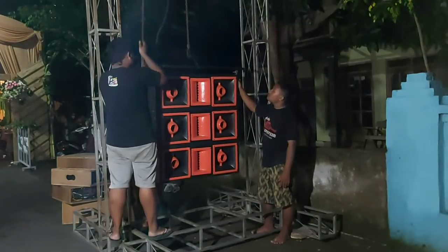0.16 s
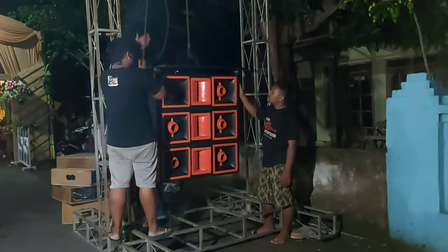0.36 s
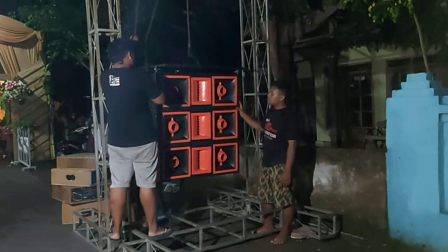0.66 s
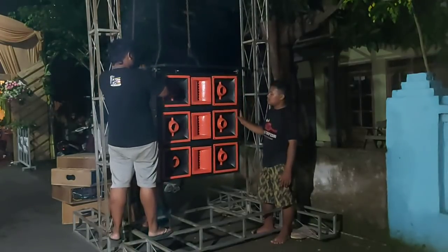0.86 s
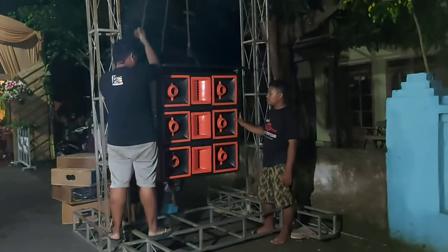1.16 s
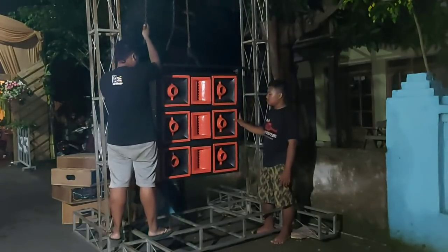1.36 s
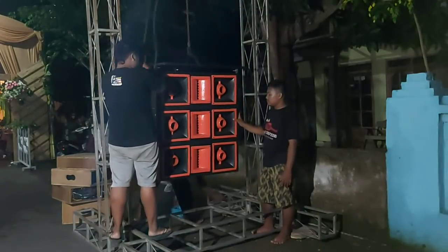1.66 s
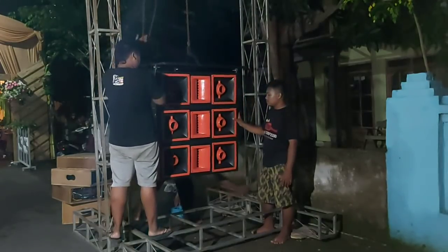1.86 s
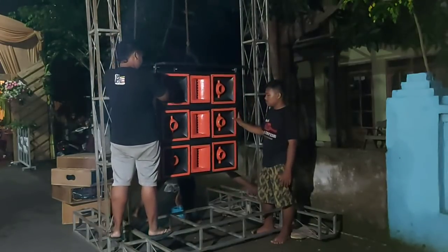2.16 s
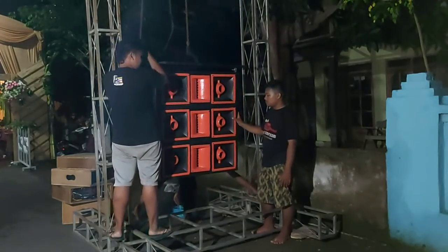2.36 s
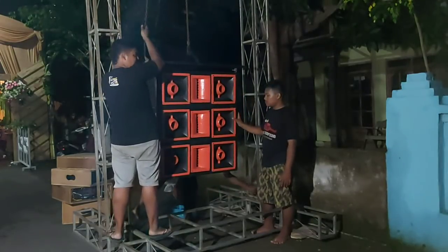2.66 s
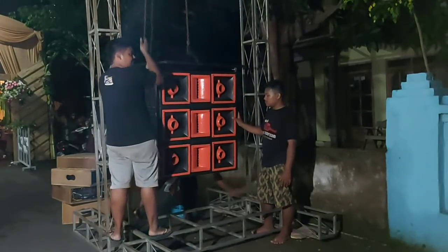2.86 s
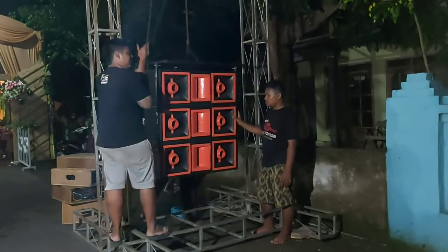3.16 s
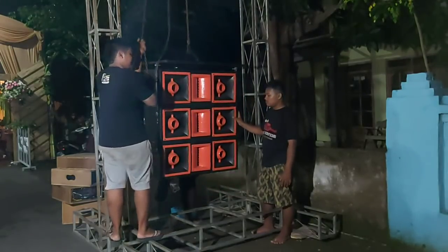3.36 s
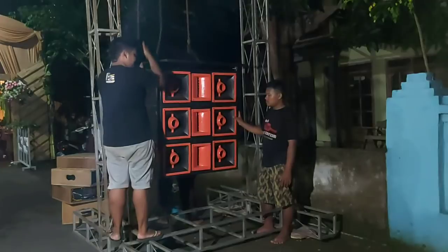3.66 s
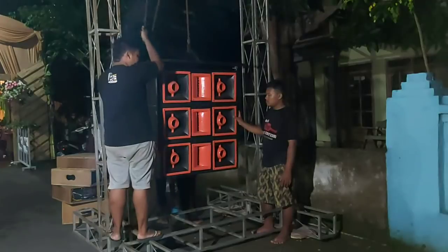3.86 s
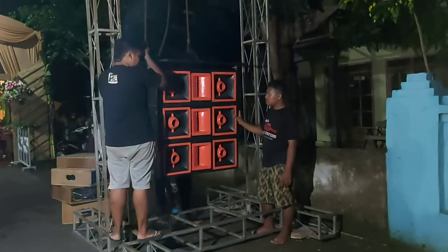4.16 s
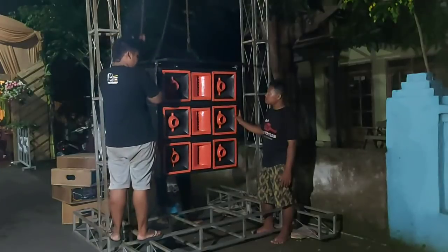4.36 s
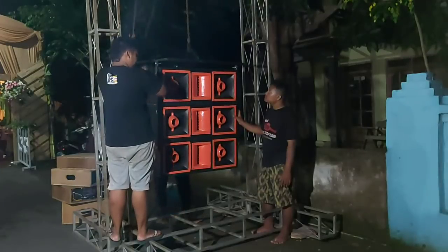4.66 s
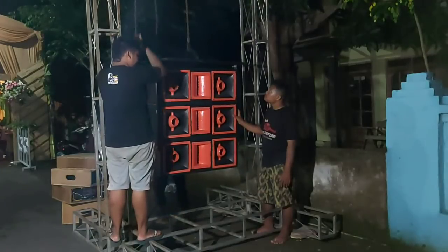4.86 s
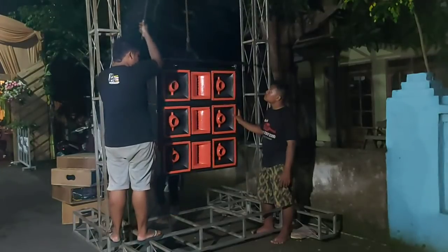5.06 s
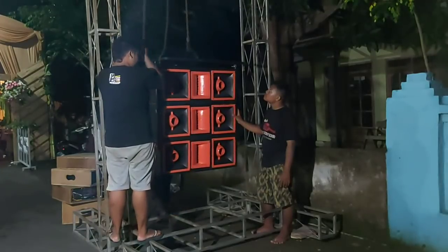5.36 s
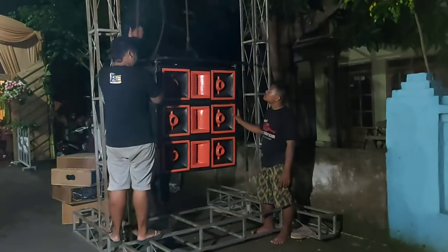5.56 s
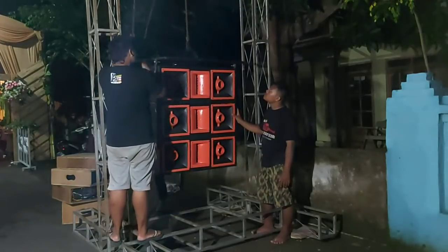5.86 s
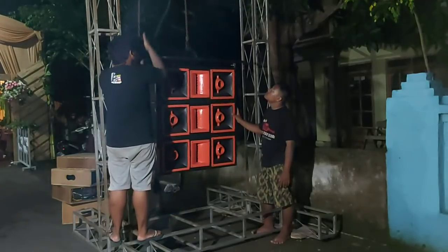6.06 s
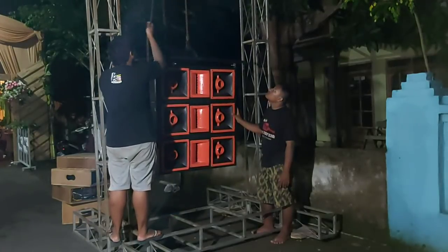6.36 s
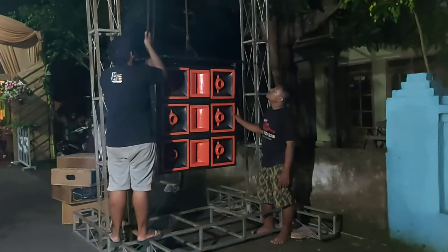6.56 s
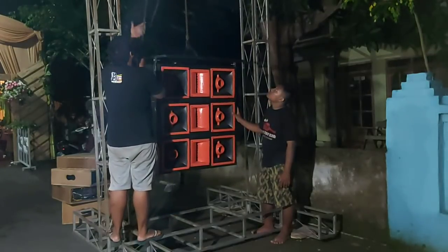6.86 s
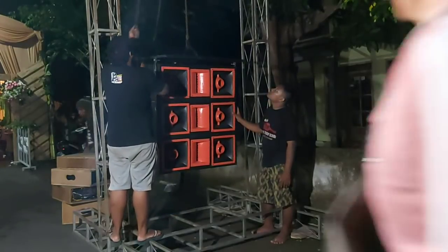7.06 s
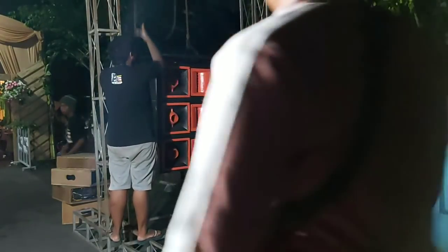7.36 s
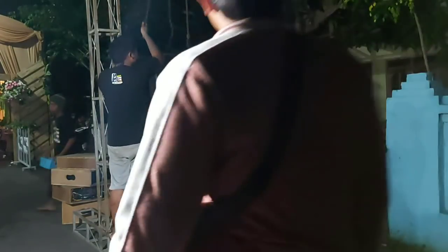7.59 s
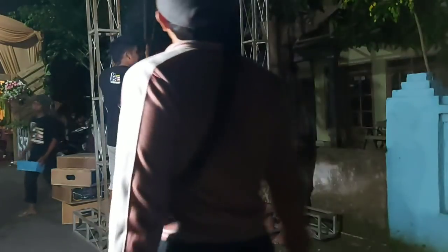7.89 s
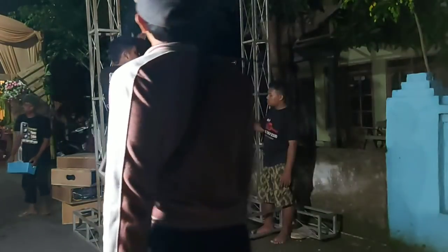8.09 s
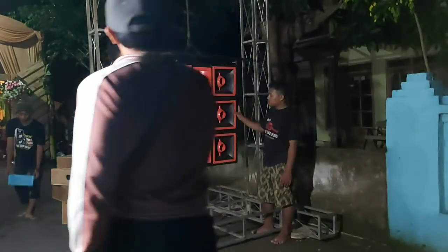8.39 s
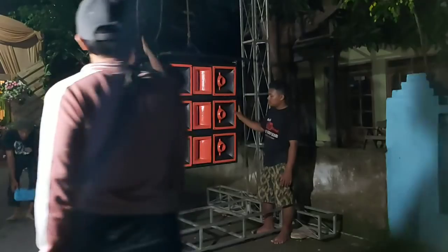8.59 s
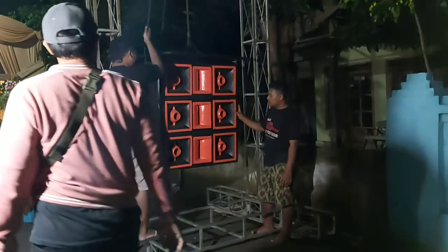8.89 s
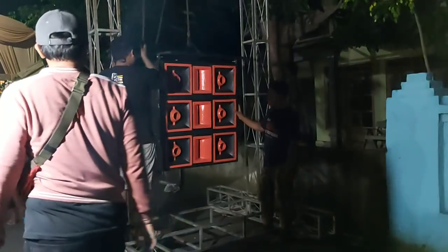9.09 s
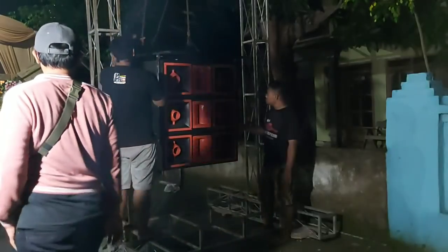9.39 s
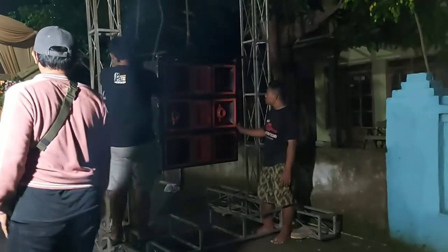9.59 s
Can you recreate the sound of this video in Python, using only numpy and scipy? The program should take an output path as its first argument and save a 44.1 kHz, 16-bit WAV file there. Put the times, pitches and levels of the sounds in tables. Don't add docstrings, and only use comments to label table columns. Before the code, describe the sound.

Fast metallic pawl clicking comes in short bursts with chain rattle, gear grind, woody knocks and a few steel clangs in a quiet night yard.

```python
import sys
import numpy as np
from scipy import signal
from scipy.fft import rfft, irfft
from scipy.io import wavfile
from scipy.ndimage import uniform_filter1d

SR = 44100
rng = np.random.default_rng(int(sys.argv[2]) if len(sys.argv) > 2 else 0)


def voltage_ratio(level):
    return 10 ** (np.asarray(level, float) / 20)


def transcribe(signal):
    frames = np.atleast_2d(signal).T
    limited = np.clip(frames, -1, 1)
    pcm = np.round(limited * 32767).astype(np.int16)
    wavfile.write(sys.argv[1], SR, pcm)


N = 429093
T = np.arange(N) / SR

# (frequency [Hz], density [dB/Hz])
NIGHT_SPECTRUM = [(18, -55), (30, -80), (64, -3), (109, 2.5), (189, -4.5), (355, 3), (801, -23), (889, -39),
                  (962, -23), (6720, -61), (16000, -98)]
# (frequency [Hz], width [Hz], level [dB])
CABINET_MODES = [(410, 22, 10.5), (527, 55, 5.5), (783, 103, 9.5), (1050, 53, 6), (1190, 95, 3),
                 (1554, 110, 3.5), (1700, 270, 0), (2040, 110, 4), (2390, 110, -24), (2400, 96, 0.5),
                 (3290, 73, -27)]
# (time [s], peak [dB], centre [Hz], drag [s])
BROAD_SLAPS = [(0.058, -16, 2040, 0.021), (0.415, -11, 1950, 0.039), (0.972, -23, 1540, 0.011),
               (2.136, -9.5, 393, 0.026), (2.39, -18, 810, 0.022), (2.933, -20.5, 802, 0.022),
               (3.397, -19.5, 2510, 0.029), (4.25, -20, 1050, 0.015), (4.429, -16, 1060, 0.022),
               (4.99, -15, 791, 0.022), (6.676, -9.5, 2040, 0.045), (7.623, -17, 1220, 0.043),
               (7.935, -13.5, 398, 0.032), (9.043, -17, 1740, 0.035), (9.106, -16, 735, 0.031),
               (9.604, -17, 2200, 0.021), (9.635, -12, 770, 0.03)]
# (time [s], peak [dB], centre [Hz], drag [s])
PANEL_KNOCKS = [(0.009, -24, 1260, 0.011), (0.434, -11, 371, 0.034), (0.598, -17, 1040, 0.035),
                (1.216, -17.5, 1260, 0.016), (1.274, -28.5, 1260, 0.021), (1.374, -25, 2110, 0.016),
                (1.634, -11.5, 2420, 0.02), (1.749, -12, 396, 0.028), (2.269, -15, 800, 0.023),
                (4.326, -12, 1840, 0.013), (6.392, -11.5, 1630, 0.01), (6.572, -20, 1610, 0.029),
                (7.225, -17, 797, 0.019), (7.312, -22, 799, 0.033), (7.421, -14, 790, 0.017),
                (8.637, -16, 366, 0.025)]
# (first drop [s], last drop [s], teeth passed [count], first tooth gap [s], strength [dB])
PULLS = [(0.0736, 0.6585, 22, 0.046, -18), (0.795, 1.254, 13, 0.057, -17.5),
         (1.529, 2.0535, 22, 0.048, -17.5), (2.137, 2.4965, 9, 0.074, -16.5),
         (2.865, 3.306, 21, 0.043, -20), (3.593, 3.942, 12, 0.043, -19.5), (4.1243, 4.563, 18, 0.058, -21),
         (4.7826, 5.173, 14, 0.048, -19.5), (5.33, 5.743, 18, 0.046, -18.5),
         (5.906, 6.357, 17, 0.048, -17.5), (6.52, 7.055, 15, .080, -18.5),
         (7.194, 7.7793, 18, 0.062, -17.5), (7.8245, 8.319, 18, 0.042, -17.5),
         (8.4146, 8.8815, 15, 0.054, -17.5), (9.068, 9.554, 18, 0.039, -17.5)]
# (time [s], peak [dB])
STRAY_DROPS = [
    (0.0516, -14),
    (2.5766, 1),
    (3.3913, -34),
    (5.8717, -28),
    (6.67, -16),
    (6.6938, -6),
    (8.3665, -37),
    (8.3844, -33),
    (9.003, -22.5),
    (9.038, -19),
]
# (frequency [Hz], density [dB/Hz])
STEEL_SPECTRUM = [(500, -5.5), (1200, -9.5), (1800, -5), (3300, -4), (4300, -1), (5200, -3.5), (6700, -0.5),
                  (10000, -2), (15000, -5), (16000, -7.5)]
# (frequency [Hz], width [Hz], level [dB])
HOUSING_MODES = [(1740, 400, -5), (2420, 130, 3), (2845, 300, -2), (4180, 53, 3.5), (4457, 82, 5.5),
                 (5860, 210, -2.5), (6740, 150, 2.5), (7750, 58, -13.5), (7740, 37, -18), (7900, 23, -14),
                 (8760, 190, 4), (10300, 81, -7), (11100, 67, 4), (11720, 62, 6.5), (12360, 120, 1.5)]
# (time [s], level [dB], contact [s], noise tail [dB], tail T60 [s])
CLANGS = [
    (2.579, -19, 0.0041, -17.5, 0.69),
    (3.662, -17, 0.044, -30, .2),
    (.054, -22.5, 0.0026, -33, 0.091),
]
# (frequency [Hz], level [dB], T60 [s])
CLANG_MODES = [
    [(1490, -6, 0.12), (2116, -7, 0.29), (2680, -7.5, 0.68), (4200, -9, 0.45), (6170, -3, 0.25),
     (6280, -2, 0.26), (6400, 4, 0.24), (8020, -2, 0.26), (8613, -7, 0.19)],
    [(5150, -12, .35), (5060, -21, .35), (7747, -13, .1), (7880, -3.5, 0.58), (11180, 2, 0.22),
     (11190, -10, .4), (14518, -14, .11)],
    [(4750, 8.5, 0.031), (7100, -19, 0.046)],
]
# (frequency [Hz], width [Hz], level [dB])
GEAR_MODES = [(758, 96, 6.5), (1110, 260, -3.5), (1610, 220, 2), (2210, 180, -1.5), (2420, 160, -4),
              (2870, 280, -14)]
# (frequency [Hz], width [Hz], level [dB])
TRUSS_MODES = [(227, 17, 4), (284.5, 39.4, 4.5), (354.7, 19, -10), (434.5, 15, 5.5), (550, 40, -12.5)]

NIGHT_DB = -41.5
BROAD_DB_PER_OCTAVE, PANEL_DB_PER_OCTAVE = 3, 9
SPEED_UP, SLOW_DOWN, LAST_LONGER = 0.533, 0.54, 0.787
TOOTH_JITTER, DROP_SCATTER_DB, DROP_DB_PER_OCTAVE = 0.061, 2.1, 1
BRISK_TEETH_PER_S, COAST_S, TRUSS_LAG_S = 46.7, 0.041, 0.042
# (level at a brisk pull [dB], slope [dB/octave of speed], level at rest [dB])
LINKS_LAW = (-22, 7.5, -45.5)
GRIND_LAW = (-31, 4.2, -46)
HUM_LAW = (-31.5, 5.26, -45.5)
YARD_T60_S, YARD_DB = 0.35, -5.5


def level(x, db):
    return x * voltage_ratio(db) / np.sqrt(np.mean(x ** 2))


def colour(x, table):
    hz, db = np.transpose(table)
    f = np.arange(N // 2 + 1) * SR / N + 1
    gain_db = np.interp(np.log(f), np.log(hz), db)
    return irfft(rfft(x) * voltage_ratio(gain_db), N)


def ring(x, modes):
    return sum(voltage_ratio(db) * signal.lfilter(*signal.iirpeak(hz, hz / width, SR), x) for hz, width, db in modes)


def decay(x, t60_s):
    return signal.lfilter([1], [1, -np.exp(-np.log(1000) / (t60_s * SR))], x)


def pair(like, size=N):
    common, opposed = rng.standard_normal((2, size))
    common = common * np.sqrt((1 + like) / 2)
    opposed = opposed * np.sqrt((1 - like) / 2)
    return np.array([common + opposed, common - opposed])


def grains(rate_hz, spread_db, t60_s):
    size = np.minimum(rng.exponential(size=N), 2.5)
    hits = rng.random(N) < rate_hz / SR
    return level(decay(hits * voltage_ratio(spread_db * size), t60_s), 0)


def night():
    throb = ring(pair(0.97), [(60, 14, -3), (101, 10, 0), (130, 20, -6)])
    drift = uniform_filter1d(rng.standard_normal(N), size=9000)
    swell = voltage_ratio(1.5 * level(drift, 0))
    air = colour(pair(0.94), NIGHT_SPECTRUM + [(16001, -60)])
    return level(air, NIGHT_DB - 2.0) + swell * level(throb, -47.0)


def slaps():
    out = np.zeros((2, N + SR))
    t = np.arange(SR // 5) / SR
    rows = [row + (BROAD_DB_PER_OCTAVE,) for row in BROAD_SLAPS]
    rows += [row + (PANEL_DB_PER_OCTAVE,) for row in PANEL_KNOCKS]
    for time_s, peak_db, centre_hz, drag_s, narrow_db in rows:
        push = pair(0.56, size=len(t)) * np.exp(-(t / drag_s) ** 3) * (1 - np.exp(-t / 0.0012))
        detune = 1 + 0.038 * rng.standard_normal(len(CABINET_MODES))
        modes = [(hz * d, width, db - narrow_db * abs(np.log2(hz / centre_hz)))
                 for (hz, width, db), d in zip(CABINET_MODES, detune)]
        thump = ring(ring(push, [(1330, 1600, 0)]), [(1330, 1600, -7.5 - narrow_db)])
        knock = ring(push, modes) + thump
        i = int((time_s - 0.003) * SR)
        out[:, i:i + len(t)] += knock * voltage_ratio(peak_db + 3.0) / np.abs(knock.mean(axis=0)).max()
    return out[:, :N]


def teeth():
    rows = []
    for first_s, last_s, count, first_gap_s, strength_db in PULLS:
        k = np.arange(count)
        late = SPEED_UP ** k
        slowing = 1 + LAST_LONGER * SLOW_DOWN ** k[::-1]
        even = (1 - late) * (slowing + TOOTH_JITTER * rng.standard_normal(count))
        spare_s = last_s - first_s - first_gap_s * late.sum()
        gaps_s = first_gap_s * late + even * spare_s / even.sum()
        times_s = first_s + np.append(0, np.cumsum(gaps_s))
        rates = 1 / np.append(1.28 * gaps_s[0], gaps_s)
        rows += zip(times_s, rates, np.full(len(times_s), strength_db))
    return np.transpose(rows)


def pawl(times_s, rate, strength_db):
    db = strength_db + DROP_DB_PER_OCTAVE * np.log2(rate / BRISK_TEETH_PER_S)
    db = db + DROP_SCATTER_DB * rng.standard_normal(len(db))
    times_s, db = np.transpose(sorted(list(zip(times_s, db)) + STRAY_DROPS))
    at = ((times_s + 0.0014) * SR).astype(int)
    drops = np.zeros(N)
    drops[at] = voltage_ratio(-18.5 + 0.56 * (db + 18.0))
    shake = voltage_ratio(-13.0) * decay(drops, 0.063) + voltage_ratio(-3.5) * decay(drops, 0.14)
    shake = uniform_filter1d(shake, size=90, origin=44)
    burst = shake * pair(0.26)
    tooth = np.searchsorted(at, np.arange(N), side="right")
    share = voltage_ratio(5.2 * rng.standard_normal((len(at) + 1, len(HOUSING_MODES))))
    rings = sum(ring(burst * share[tooth, k], [mode]) for k, mode in enumerate(HOUSING_MODES))
    crack = level(colour(burst, STEEL_SPECTRUM), 0)
    return (crack + level(rings, -8.5)) * np.sqrt(np.mean(burst ** 2)) * voltage_ratio(-2.5)


def clangs():
    out = np.zeros((2, N))
    t = T[:SR]
    for (time_s, db, contact_s, tail_db, tail_t60_s), modes in zip(CLANGS, CLANG_MODES):
        def fall(t60_s):
            free_s = np.maximum(t - contact_s, 0)
            return np.exp(-np.log(1000) * free_s / t60_s) * (1 - np.exp(-t / 0.002))

        tones = sum(voltage_ratio(mode_db) * fall(t60_s) * np.sin(2 * np.pi * (hz * t + rng.random((2, 1)) / 6))
                    for hz, mode_db, t60_s in modes)
        hiss = colour(pair(0.26), [(500, -11), (1700, 8.5), (6000, 4.5), (15000, -14.5)])
        tail = level(hiss, tail_db)[:, :SR] * fall(tail_t60_s)
        strike = voltage_ratio(tail_db) * pair(0.3, size=SR) * np.exp(-t / 0.012)
        i = int(time_s * SR)
        out[:, i:i + SR] += voltage_ratio(db) * tones + tail + strike
    return out


def running(times_s, rate, strength_db):
    k = np.maximum(np.searchsorted(times_s, T) - 1, 0)
    waited_s = np.maximum(T - times_s[k] - 1 / rate[k], 0) + (T < times_s[0])
    return np.log2(rate[k] / BRISK_TEETH_PER_S) - waited_s / COAST_S + (strength_db[k] + 18) / 6


def follow(law, speed):
    brisk_db, db_per_octave, rest_db = law
    return np.maximum(brisk_db + db_per_octave * speed, rest_db)


def chain(links_db, grind_db, hum_db):
    ticks = grains(1500, 2.6, 0.012) * pair(0.3)
    links = level(colour(ticks, STEEL_SPECTRUM), 0) + level(ring(ticks, HOUSING_MODES), -13)
    meshing = grains(300, 2.2, 0.03) * pair(0.6)
    scrape = colour(pair(0.57), [(400, -19), (700, -9), (3000, 1.0), (4500, -39)])
    grind = level(ring(meshing, GEAR_MODES), 0) + level(scrape, -3.0)
    jolts = grains(150, 1.5, 0.06) * pair(0.96)
    feet = ring(jolts, [(64.0, 22, -3), (102.4, 20, 9), (139, 39, -5), (83.4, 16, -4)])
    hum = level(ring(jolts, TRUSS_MODES), 0) + level(feet, -8)
    links_db = np.minimum(links_db, -23)
    return voltage_ratio(links_db - 7.0) * links + voltage_ratio(grind_db - 7.5) * grind + voltage_ratio(hum_db - 2.0) * hum


def yard(x, wet_db):
    t = T[:SR // 2]
    fade = np.exp(-np.log(1000) * t / YARD_T60_S) * (t > 0.004)
    mid, side = rng.standard_normal((2, len(t))) * fade
    side = signal.lfilter(*signal.butter(1, 1100, "highpass", fs=SR), side)
    tail = signal.lfilter([1], [1, -0.3], np.array([mid + side, mid - side]))
    tail = tail / np.sqrt(np.sum(tail ** 2) / 2)
    return x + voltage_ratio(wet_db) * signal.fftconvolve(x, tail, axes=1)[:, :N]


def scene():
    knocks = slaps()
    drops = teeth()
    speed = uniform_filter1d(running(*drops), size=2500)
    lagging = np.interp(T - TRUSS_LAG_S, T, speed)
    moving = chain(follow(LINKS_LAW, speed), follow(GRIND_LAW, speed), follow(HUM_LAW, lagging))
    hoist = pawl(*drops) + moving + clangs() + voltage_ratio(-2.5) * knocks
    balance_db = np.array([[-0.55], [0.55]])
    return (yard(hoist, YARD_DB) + 0.07 * knocks + night()) * voltage_ratio(balance_db)


def top_cut(x):
    return signal.sosfilt(signal.butter(12, 16640, fs=SR, output="sos"), x)


def record(dry):
    mid, side = (dry[0] + dry[1]) / 2, (dry[0] - dry[1]) / 2
    unlike = side - mid * np.mean(side * mid) / np.mean(mid ** 2)
    side = side - 0.29 * signal.lfilter(*signal.butter(1, 500, fs=SR), unlike)
    x = np.array([mid + side, mid - side])
    x = signal.sosfilt(signal.butter(3, 52, "highpass", fs=SR, output="sos"), x)
    x = np.tanh(0.8 * x) / 0.8
    x = signal.sosfilt(signal.ellip(10, 0.3, 70, 15450, fs=SR, output="sos"), x)
    return top_cut(x)


dry = scene()
out = record(dry)
transcribe(out)
```